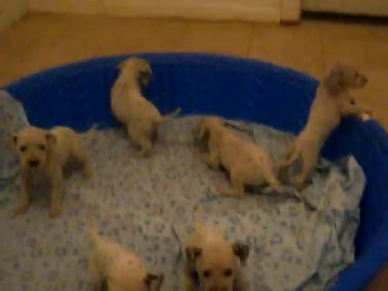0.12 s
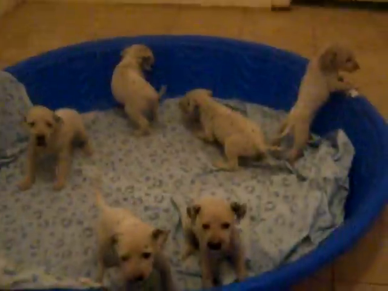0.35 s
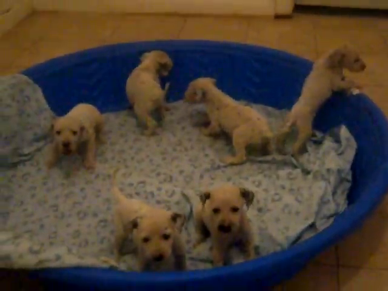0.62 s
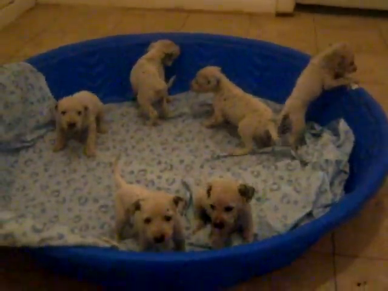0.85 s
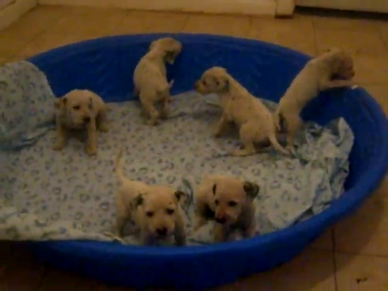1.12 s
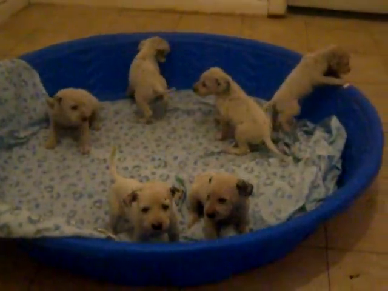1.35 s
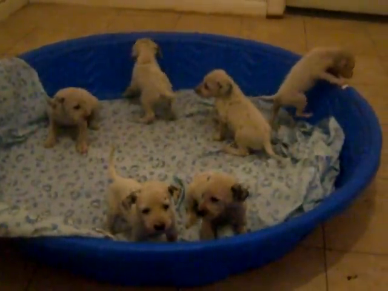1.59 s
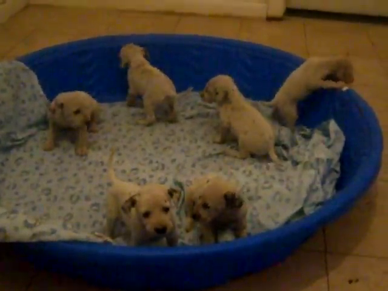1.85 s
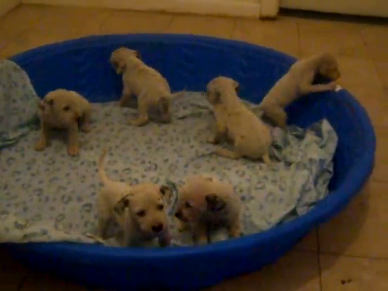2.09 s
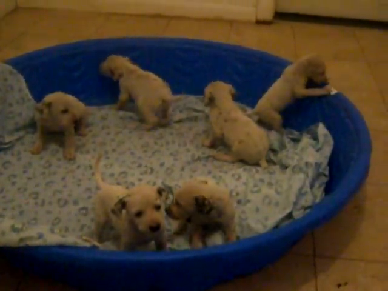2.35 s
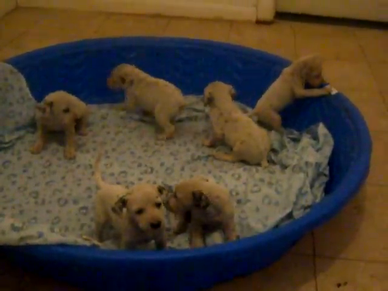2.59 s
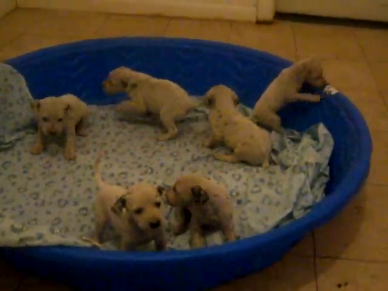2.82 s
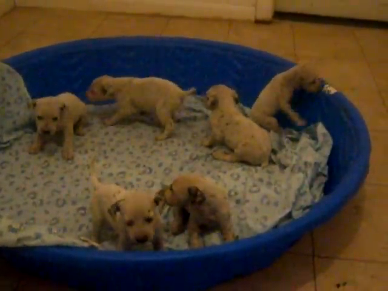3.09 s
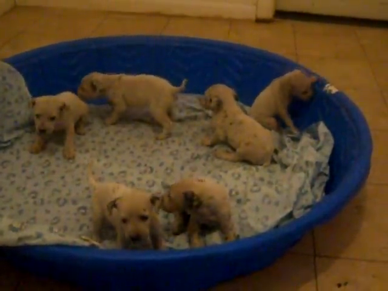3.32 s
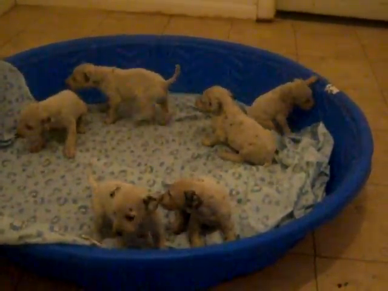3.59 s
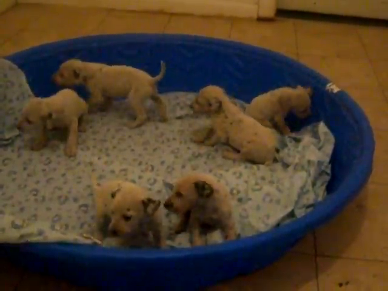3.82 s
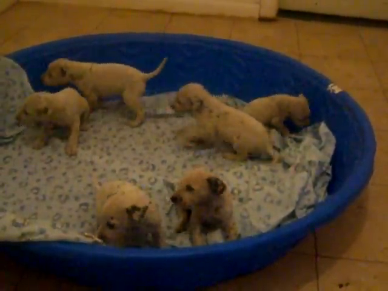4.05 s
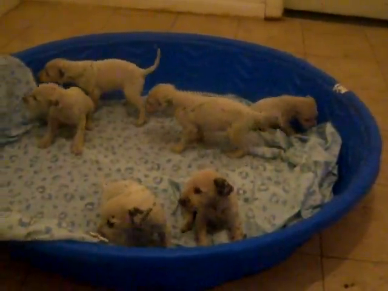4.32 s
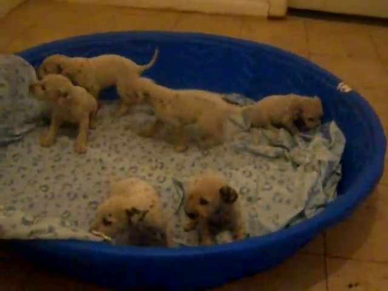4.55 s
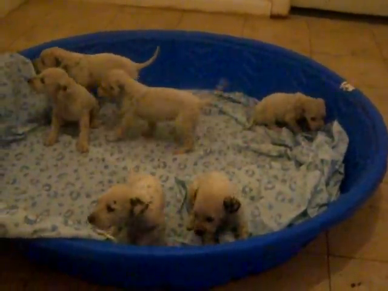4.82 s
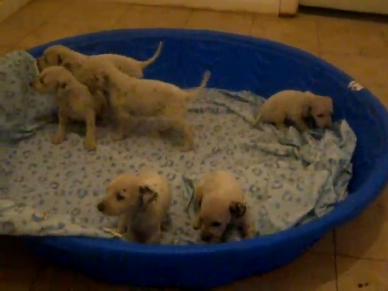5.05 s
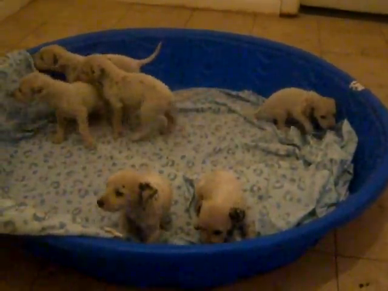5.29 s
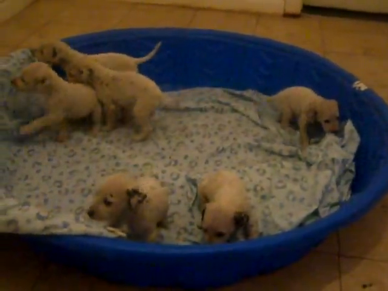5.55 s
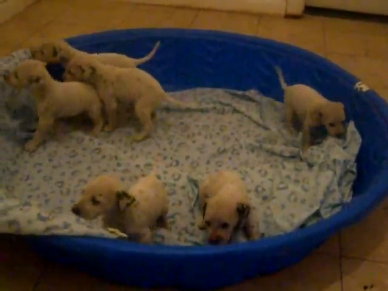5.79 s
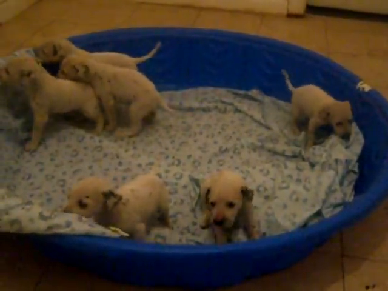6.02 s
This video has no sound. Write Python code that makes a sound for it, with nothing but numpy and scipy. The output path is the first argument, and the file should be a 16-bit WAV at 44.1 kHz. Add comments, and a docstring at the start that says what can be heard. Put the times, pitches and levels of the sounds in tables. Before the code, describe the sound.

Indoors, close to several small puppies: a high yip climbs for half a second, followed by sharp short yelps that jump up and some that fall away, the loudest crackling with overload. Others whimper softly in between. After four seconds only low grunts, a few quiet whines and light claw scratches remain, over faint cloth rustle, room echo and a steady, slightly uneven pulse of dull thuds, about ten a second, from the cheap recorder.

```python
"""A litter of puppies in a plastic tub yips, whines and grunts: vocal-fold overtones shaped by throat and mouth.
A hard-floored room answers the voices with dense echoes of decaying noise.
Claws scratch and tap in bursts of noise; paws on cloth and room air make a patchy noise bed.
The small recorder clips the loudest yips and adds a soft low thud of its own about ten times a second."""
import sys
import numpy as np
from scipy import signal
from scipy.fft import rfft, irfft
from scipy.io import wavfile
from scipy.ndimage import uniform_filter1d

SR = 44100
rng = np.random.default_rng(int(sys.argv[2]) if len(sys.argv) > 2 else 0)


def level_to_linear(level):
    """Convert decibel levels to linear amplitude factors, elementwise."""
    exponent = np.asarray(level, float) / 20
    return 10 ** exponent


def generate_wav(sig):
    """Save sig (samples, or channels by samples) to the path in sys.argv[1] as 16-bit PCM at SR."""
    pcm = np.round(np.clip(np.atleast_2d(sig).T, -1, 1) * 32767).astype(np.int16)
    wavfile.write(sys.argv[1], SR, pcm)


N = 271656   # length in samples

# short downward steps inside the recorder, heard as thuds: start_s
THUD_STARTS = [0.0527, 0.157, 0.221, 0.295, 0.349, 0.463, .8576, .942, .991, 1.1228, 1.1573, 1.205, 1.27,
               1.3554, 1.4668, 1.571, 1.6203, 1.733, 1.8193, 2.031, 2.1403, 2.236, 2.2874, 2.3935, 2.495,
               2.604, 2.707, 2.7891, 2.8872, 2.9753, 3.059, 3.1597, 3.274, 3.3623, 3.4716, 3.7287, 3.834,
               3.9399, 4.023, 4.129, 4.24, 4.402, 4.4843, 4.5674, 4.659, 4.8006, 4.889, 4.997, 5.1106,
               5.1933, 5.2692, 5.376, 5.4736, 5.555, 5.675, 5.765, 5.8696, 5.941, 6.04, 6.1237]
# rarer upward steps: start_s
BUMP_STARTS = [.946, 1.347, 1.488, 1.677, 1.848, 1.911]
THUD_DB, BUMP_DB = -35, -29   # step heights before rounding
THUD_EDGE_HZ, COUPLING_HZ = 290, 6.2   # low-pass that rounds the steps, high-pass of the capacitor
STEP_SHORTEST_S, STEP_EXTRA_S = .0058, 0.0021   # length of a step: the least, and the mean of a random addition

# paws on cloth and room air, level before its random wobble: time_s, level_db (rms)
SHUFFLE_LEVEL = [(0, -39.5), (.17, -45.5), (.3, -50), (1.7, -46), (2.4, -53.5), (3.2, -50), (4.6, -52.5),
                 (6.16, -48)]
# relative spectrum of that bed: frequency_hz, density_db (per Hz)
AIR_SPECTRUM = [(15, -29.5), (40, 4.5), (110, 1.5), (220, 6.5), (400, 3), (1100, -1.5), (1500, -1.5),
                (3000, -9.5), (6800, -12), (8500, 0.5), (11000, -63)]

# claws on plastic and cloth; the noise starts at an rms 8 dB below level_db: start_s, level_db
CLAW_SCRATCHES = [(0.0094, -36), (0.1203, -36), (1.655, -36), (2.686, -35.5), (4.546, -39), (4.652, -42),
                  (4.77, -34.5), (5.269, -41.5), (5.439, -46), (5.9736, -42.5), (6.09, -45.5)]
# relative spectrum of the scratches: frequency_hz, density_db (per Hz)
SCRATCH_SPECTRUM = [(120, -35.5), (300, -4.5), (800, -1.5), (1300, 2.5), (2400, -2.5), (3500, -8),
                    (6000, -15), (8500, -24.5)]
SCRATCH_T60_S = 0.35

# a single claw taps the rim; onset rms of the noise before its high-pass: start_s, level_db
CLAW_TAPS = [(.0094, -33), (0.358, -21)]
TAP_LOW_HZ, TAP_T60_S = 3600, .05

# reverberation time of the room: frequency_hz, t60_s
ROOM_DECAY = [(150, 1), (500, 0.45), (1300, 0.53), (2600, 0.49), (4000, 0.49), (7000, 0.52)]
ROOM_DB, ROOM_BUILD_S = -.5, .01   # level of the whole echo tail, time constant of its rise

# the loudest puppy, one path per yip: time_s, pitch_hz, level_db (fundamental, before shaking), mouth_opening (0-1)
YIP_PATHS = [
    [(.3, 970, -29.5, 0.36), (.343, 1133, -32.5, 0.46), (.352, 1170, -16, 1.), (.43, 1161, -20, 0.61),
     (.47, 1296, -7, 0.6), (.52, 1401, -5.5, 0.4), (.65, 1576, -7.5, 0.58), (.72, 1666, -12.5, 0.54),
     (.755, 1743, -16, 0.42), (.78, 1774, -17.5, .8)],
    [(1.06, 1001, -29, .52), (1.075, 1191, -14, 0.41), (1.09, 1293, -6, 0.67), (1.11, 1343, -0.5, 0.59),
     (1.13, 1403, -10, 0.67), (1.15, 1432, -5.5, 0.26), (1.175, 1388, -18, .1), (1.2, 1316, -20, 0.4)],
    [(1.86, 866, -30.5, 0.4), (1.9, 1037, -30.5, 0.48), (1.925, 1184, -13.5, 0.54), (1.945, 1281, -5, 0.47),
     (1.968, 1279, -9.5, 0.52), (1.99, 1140, -29.5, 1), (2.03, 916, -34.5, 0.9)],
    [(2.705, 490, -31, 0), (2.73, 805, -35.5, 0.34), (2.755, 934, -40.5, 0.55), (2.77, 1009, -17.5, 0.45),
     (2.82, 1038, -25, 0.55), (2.845, 929, -25.5, 0.94), (2.87, 783.4, -36, 0.73), (2.9, 645, -37.5, 0.67),
     (2.95, 489.6, -40.5, 0), (3.03, 405, -46.5, 0), (3.12, 365.5, -54.5, .05)],
    [(3.49, 587, -25, 0), (3.51, 871, -41, 0.49), (3.53, 1083, -11, 0.47), (3.55, 1269, -1, 0.5),
     (3.58, 1310, -5.5, 0.56), (3.62, 1298, -9, 0), (3.645, 1141, -22, 0.97), (3.67, 874, -36.5, 0.65),
     (3.72, 710, -55, .9)],
    [(3.99, 520, -35, 0.23), (4.02, 803, -34, 0.43), (4.05, 936.6, -34.5, 0.53), (4.08, 1028, -29.5, 0.58),
     (4.1, 986, -28.5, .7), (4.135, 852, -31.5, 0.9), (4.155, 767, -32, 0.69), (4.18, 712, -54, 0.78),
     (4.24, 660, -37, 0)],
]
# the colour of each yip: tilt_db (per octave), tilt_change_db (start to end, per octave), roughness (0-1)
YIP_COLOURS = [(-6, -4.5, 0.08), (-7, -9, 0.16), (-3.5, -3, 0.21), (-1.5, -0.5, 0.5), (-4, -1, 0.3),
               (0.5, 12, 0.09)]
# the others whining, one path per whine: time_s, pitch_hz, level_db (fundamental, before shaking), mouth_opening (0-1)
WHINE_PATHS = [
    [(1.34, 1030, -30.5, 0.79), (1.38, 1043, -40.5, 1), (1.45, 1005, -35.5, 0.95), (1.5, 969, -39, 0.71),
     (1.545, 916, -38.5, 0.8), (1.58, 774, -47.5, .76)],
    [(1.617, 811.5, -23.5, 0.63), (1.645, 886, -40.5, 0.64), (1.68, 830, -26.5, 0.65),
     (1.71, 751, -33, 0.5), (1.735, 664, -30, 0.33), (1.78, 610.4, -33.5, 0.4), (1.84, 589, -35, 0),
     (1.87, 590, -24, 0.8)],
    [(3.58, 768, -22, 0.3), (3.64, 746, -45, .2), (3.72, 681, -37.5, 0.3), (3.8, 649, -52, 0),
     (3.86, 590, -48, 0.73)],
    [(5.15, 474.3, -40.5, 0.14), (5.21, 541.4, -45.5, 0.5), (5.25, 569, -33, 0.26), (5.3, 548, -45.5, 0.46),
     (5.35, 530.6, -44.5, 0.37), (5.43, 516, -60, .3)],
    [(5.598, 762, -26, 0.36), (5.62, 699, -35.5, 0.57), (5.66, 641.6, -32, 0.31), (5.7, 582, -37.5, 0.54),
     (5.72, 480.5, -45, 0.23), (5.76, 406, -43.5, 0)],
    [(3.965, 248.8, -47, 0.17), (4.02, 270.2, -49.5, .07), (4.06, 302.7, -44.5, .09),
     (4.12, 332.4, -40.5, 0.09), (4.2, 331, -51, 0.13)],
    [(4.43, 417.5, -44, 0.45), (4.46, 447, -39, 0.49), (4.54, 437.5, -56, 0.39), (4.59, 428, -39, 0.42)],
]
# the colour of each whine: tilt_db (per octave), tilt_change_db (start to end, per octave), roughness (0-1)
WHINE_COLOURS = [(-8.5, -5.5, .15), (-9, -4, 0.5), (-13.5, -7, 0.5), (-7.5, -9.5, 0), (-10, 3, 0.38),
                 (-5, 4, 0.38), (-11, -3, 0.8)]
# short soft calls, low grunts and two faint whines, level_db at the louder end:
# start_s, length_s, first_pitch_hz, last_pitch_hz, level_db
SOFT_CALLS = [(1.258, 0.14, 588, 500, -49), (3.301, 0.038, 657, 574, -40),
              (4.248, 0.049, 224.3, 186, -42.5), (4.409, 0.13, 265, 352, -48.5),
              (4.546, 0.065, 227, 195, -53), (4.645, 0.12, 184.5, 177.8, -52.5),
              (4.786, 0.1, 284, 240, -53), (4.973, 0.055, 206, 210, -52.5)]
SOFT_COLOUR, SOFT_MOUTH = (-8, -6, 0.68), .05   # colour columns as for a whine; mouth nearly shut
SOFT_SAG_DB, SOFT_SWELL_DB = -8, 25   # level change over a soft call: fixed part, plus a part per octave of pitch rise

# resonances of the throat, applied relative to the fundamental: frequency_hz, gain_db
THROAT_RESPONSE = [(150, 4), (400, 12), (700, 17), (1100, 6), (1700, 10), (2300, -0.5), (3000, 1.5),
                   (3600, 6.5), (4200, 5.5), (4900, 4), (5800, -11), (7000, -7.5), (8500, -6.5)]
MOUTH_SHUT_HZ, MOUTH_WIDE_HZ = 398, 2115   # mouth resonance at opening 0 and 1
MOUTH_DB, MOUTH_OCTAVES = 10, .25   # its boost and width
MUFFLE_HZ, MUFFLE_DB = 1800, -45   # shut lips: loss per octave above this frequency
ROUGHENING = 0.83   # roughness runs from 1 - this to 1 + this times its mean, within 0-1
GLIDE_TILT_DB = 0.3275   # added tilt per octave, for each octave a second of pitch rise

# a second, lower vibration of the folds in the first two yips:
# start_s, end_s, pitch_hz, level_db (added to the gain of each mixed tone)
SECOND_VIBRATION = [(.52, .77, 1098, -11.5), (1.11, 1.21, 944.6, -21)]
SECOND_ONSET_DB_PER_S = 1200.5   # slope of its rise and fall outside those times
# sum and difference tones: pitch_multiple, second_pitch_multiple
MIXED_MULTIPLES = [(0, 1), (1, 1), (2, -1), (2, 1), (1, -1), (1, 2), (3, -1), (3, 1), (2, 2)]
# their gains in the same order: gain_db
MIXED_GAINS = [-6, -0.5, 1.5, -9, -29, -4, -17, -19.5, -17]

NOTCH_HZ, NOTCH_WIDTH_HZ, TOP_HZ = 4720, 280, 9700   # microphone: dip, its width, 60 dB down from here up
CLIP, LOPSIDED = .69, 0.041   # clipping level and downward offset of its range, full scale 1
BIAS_SHIFT = 0.065   # pull on the rest point per unit of filtered overload
OUTPUT_CUT_HZ, TREBLE_LEFT_DB = 8300, -8   # treble above the cut is turned down to this


def in_time(rows, t):
    """Read the columns of a time table at times t."""
    s, *columns = np.transpose(rows)
    return [np.interp(t, s, c) for c in columns]


def at_hz(points, hz):
    """Read a spectrum in dB along a logarithmic frequency axis."""
    table = np.array(points)
    return np.interp(np.log(hz), np.log(table[:, 0]), table[:, 1])


def rms_one(x):
    """Scale to an rms of 1."""
    return x / np.sqrt(np.mean(x ** 2) + 1e-20)


def filtered(x, order, hz, kind="low"):
    """Butterworth filter."""
    return signal.sosfilt(signal.butter(order, hz, kind, fs=SR, output="sos"), x)


def wobble(rate_hz, size):
    """Slow random motion of rms 1: noise twice through a one-pole low-pass."""
    r = np.exp(-2 * np.pi * rate_hz / SR)
    noise = rng.standard_normal(size + 4000)
    slow = signal.lfilter([1], [1, -2 * r, r * r], noise)
    return rms_one(slow[4000:])   # the filter has settled by then


def coloured(x, spectrum):
    """Shape a noise by a spectrum; rms 1."""
    hz = np.arange(len(x) // 2 + 1) * SR / len(x) + 1
    return rms_one(irfft(rfft(x) * level_to_linear(at_hz(spectrum, hz)), len(x)))


def thuds():
    """Rounded steps; the coupling capacitor leaves a slow overshoot after each."""
    steps = np.zeros(N)
    for starts, height in ((THUD_STARTS, -level_to_linear(THUD_DB)), (BUMP_STARTS, level_to_linear(BUMP_DB))):
        lengths = STEP_SHORTEST_S + STEP_EXTRA_S * rng.exponential(1, len(starts))
        for s, length in zip(starts, lengths):
            steps[round(s * SR):round((s + length) * SR)] += height
    rounded = filtered(steps + 1e-18, 2, THUD_EDGE_HZ)
    return filtered(rounded, 1, COUPLING_HZ, "high")


def shuffle():
    """Paws on cloth and room air: a noise bed whose level drifts and wobbles."""
    level_db, = in_time(SHUFFLE_LEVEL, np.arange(N) / SR)
    level_db = level_db + 0.76 * wobble(8.3, size=N)
    return level_to_linear(level_db) * coloured(rng.standard_normal(N), AIR_SPECTRUM)


def bursts(t, start_s, level_db, t60_s):
    """Envelope that starts at once and dies away exponentially."""
    return (t >= start_s) * level_to_linear(level_db - 60 * np.maximum(t - start_s, 0) / t60_s)


def scratches():
    """Each claw scratch is a burst of coloured noise that dies away."""
    t = np.arange(N) / SR
    envelope = sum(bursts(t, s, level_db - 8.0, SCRATCH_T60_S) for s, level_db in CLAW_SCRATCHES)
    return envelope * coloured(rng.standard_normal(N), SCRATCH_SPECTRUM)


def ticks():
    """A claw on the rim gives very short, bright bursts of noise."""
    t = np.arange(N) / SR
    envelope = sum(bursts(t, s, level_db, TAP_T60_S) for s, level_db in CLAW_TAPS)
    return envelope * filtered(rng.standard_normal(N), 4, TAP_LOW_HZ, "high")


def room(x):
    """Dense echoes: noise that builds up fast and dies band by band."""
    t = np.arange(SR) / SR
    edges = 100 * 2 ** np.arange(0, 7, .5)   # half-octave bands
    white, tail = rng.standard_normal((2, SR)), np.zeros(SR)
    for k, (low, high) in enumerate(zip(edges, edges[1:])):
        t60 = at_hz(ROOM_DECAY, np.sqrt(low * high))
        band = filtered(white[k % 2], 2, [low, high], "band")   # neighbours use different noise
        tail += band * level_to_linear(-60 * t / t60)
    tail *= 1 - np.exp(-t / ROOM_BUILD_S)
    tail /= np.sqrt(np.sum(tail ** 2))
    return level_to_linear(ROOM_DB) * signal.fftconvolve(x, tail)[:N]


def colouring(colour, pitch, roughening):
    """Tilt drifts along a call and is brighter while the pitch climbs; roughness can grow towards the end."""
    tilt_db, change_db, rough = colour
    progress = np.linspace(-.5, .5, len(pitch))
    octaves_per_s = np.gradient(np.log2(pitch)) * SR
    glide = np.clip(uniform_filter1d(octaves_per_s, size=600), -20, 20)
    tilt_db = tilt_db + change_db * progress + GLIDE_TILT_DB * glide
    return tilt_db, np.clip(rough * (1 + 2 * roughening * progress), 0, 1)


def tract(freq_hz, opening):
    """Throat resonances plus a mouth resonance that rises as the mouth opens; shut lips muffle the treble."""
    mouth_hz = MOUTH_SHUT_HZ + (MOUTH_WIDE_HZ - MOUTH_SHUT_HZ) * np.clip(opening, 0, 1)
    octaves_off = np.log2(freq_hz / mouth_hz)
    gain_db = at_hz(THROAT_RESPONSE, freq_hz) + MOUTH_DB * np.exp(-(octaves_off / MOUTH_OCTAVES) ** 2)
    shut = np.maximum(1 - 2 * opening, 0)
    return gain_db + MUFFLE_DB * shut * np.log2(np.maximum(freq_hz / MUFFLE_HZ, 1))


def second_vibration(t, second, phase, shakes_db):
    """Two vibrations in one airflow multiply into sum and difference tones."""
    begin, stop, low_hz, low_db = second
    outside_s = np.maximum(np.maximum(begin - t, t - stop), 0)
    low_db = low_db - SECOND_ONSET_DB_PER_S * outside_s
    low = 2 * np.pi * np.cumsum(low_hz * (1 + .012 * wobble(60.0, size=len(t)))) / SR
    tones = sum(level_to_linear(db + shakes_db[m]) * np.sin(m * phase + n * low)
                for (m, n), db in zip(MIXED_MULTIPLES, MIXED_GAINS))
    return level_to_linear(low_db) * tones


def breath(phase, opening):
    """Air hisses out once a cycle of the folds, duller when the mouth is less open."""
    puffs = (1 + np.cos(phase)) * coloured(rng.standard_normal(len(phase)), THROAT_RESPONSE)
    cut_hz = MUFFLE_HZ * 2 ** (9.4 * np.mean(opening) - 1)
    return filtered(puffs, 2, min(cut_hz, SR / 3))


def call(rows, colour, second=None, roughening=ROUGHENING, jitter=0.011, breath_db=-21.5):
    """Overtones of the vocal folds through throat and mouth; roughness shakes pitch and levels and lets air hiss."""
    start, end = round(rows[0][0] * SR), round(rows[-1][0] * SR)
    t = np.arange(start, end) / SR
    pitch, level_db, opening = in_time(rows, t)
    tilt_db, rough = colouring(colour, pitch, roughening)
    shaken_pitch = pitch * (1 + jitter * rough * wobble(100.0, size=len(t)))
    phase = 2 * np.pi * np.cumsum(shaken_pitch) / SR
    k = np.arange(1, 13)[:, None]   # overtone numbers, 1 is the fundamental
    tract_db = tract(k * pitch, opening)
    shake = wobble(49.0, size=len(t))
    shifted = np.array([np.roll(shake, 997 * j) for j in range(len(k))])   # overtones shake apart
    shakes_db = 12.0 * rough * shifted
    shakes_db[0] *= .4   # the fundamental is the steadiest
    gains = level_to_linear(tract_db - tract_db[0] + tilt_db * np.log2(k) + shakes_db)
    gains = gains * (k * pitch < SR / 4)
    tone = np.sum(gains * np.sin(k * phase + k ** 2), axis=0)
    if second:
        tone += second_vibration(t, second, phase, shakes_db)
    hiss = rough * level_to_linear(breath_db) * breath(phase, opening)
    fade = np.clip(np.minimum(t - t[0], t[-1] - t) / 0.016, 0, 1)   # 16 ms at each end
    return start, fade * level_to_linear(level_db) * (np.sqrt(2) * tone + hiss)


def soft_call(start_s, length_s, first_hz, last_hz, level_db):
    """A breathy call, shaky in pitch, from a nearly shut mouth; it swells or sags with its pitch."""
    change_db = SOFT_SAG_DB + SOFT_SWELL_DB * np.log2(last_hz / first_hz)
    rows = [(start_s, first_hz, level_db - max(change_db, 0), SOFT_MOUTH),
            (start_s + length_s, last_hz, level_db + min(change_db, 0), SOFT_MOUTH)]
    return call(rows, SOFT_COLOUR, roughening=0, jitter=.09, breath_db=-4)


def puppies():
    """All yips, whines and short soft calls, each at its time."""
    seconds = list(SECOND_VIBRATION) + [None] * (len(YIP_PATHS) - len(SECOND_VIBRATION))
    calls = [call(*yip) for yip in zip(YIP_PATHS, YIP_COLOURS, seconds)]
    calls += [call(*whine) for whine in zip(WHINE_PATHS, WHINE_COLOURS)]
    calls += [soft_call(*row) for row in SOFT_CALLS]
    out = np.zeros(N)
    for start, sound in calls:
        out[start:start + len(sound)] += sound
    return out


def scene():
    """Voices with their echoes, over claws, paws and air; one channel."""
    voices = puppies()
    return (voices + room(voices) + scratches() + ticks() + shuffle())[None]


def top_cut(x):
    """Nothing passes above the cut-off."""
    return signal.sosfilt(signal.butter(12, 15760, fs=SR, output="sos"), x)


def record(dry):
    """The microphone dips and ends in the treble; the input stage clips hard, a little off centre."""
    x = signal.lfilter(*signal.iirnotch(NOTCH_HZ, NOTCH_HZ / NOTCH_WIDTH_HZ, fs=SR), dry)
    x = signal.sosfilt(signal.cheby2(8, 60, TOP_HZ, fs=SR, output="sos"), x) + thuds()
    excess = np.maximum(np.abs(x) - CLIP, 0)
    sag = filtered(excess, 2, [15.0, 150.0], "band")   # overload pulls the stage's rest point down
    clipped = np.clip(x, -CLIP - LOPSIDED, CLIP - LOPSIDED) - BIAS_SHIFT * sag
    dull = signal.sosfiltfilt(signal.butter(4, OUTPUT_CUT_HZ, fs=SR, output="sos"), clipped)
    mix = dull + level_to_linear(TREBLE_LEFT_DB) * (clipped - dull)   # the overload's top overtones come through weakened
    return top_cut(mix)


dry = scene()
out = record(dry)
generate_wav(out)
```